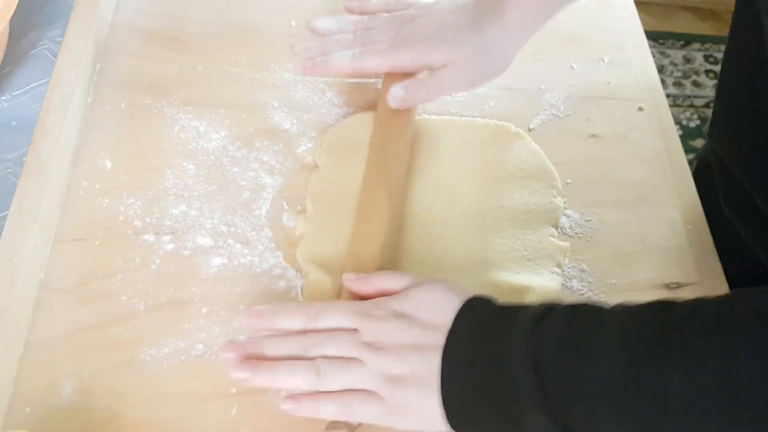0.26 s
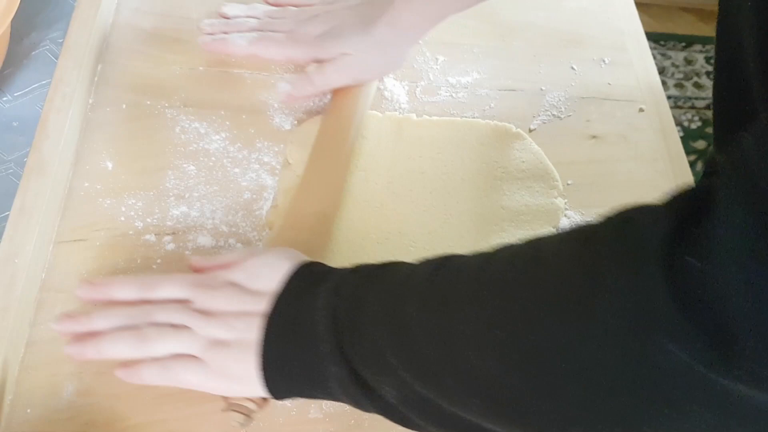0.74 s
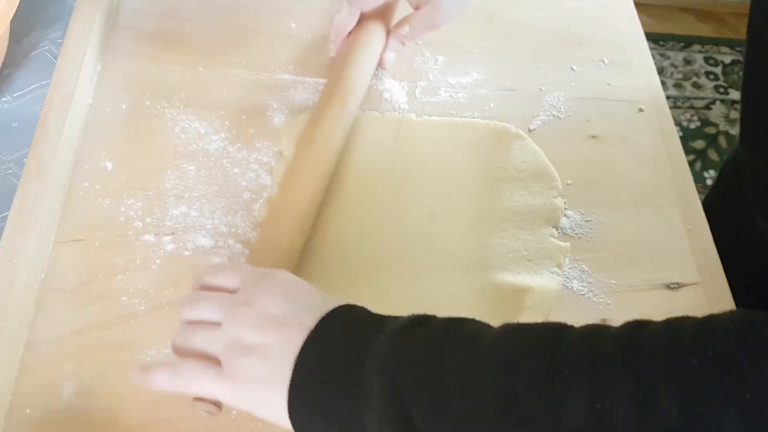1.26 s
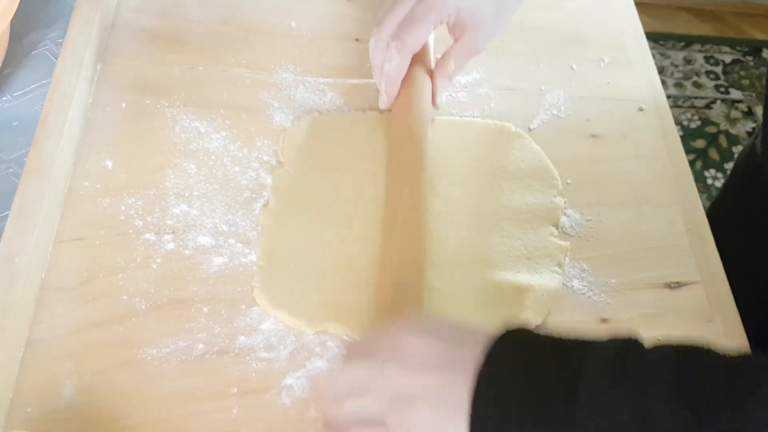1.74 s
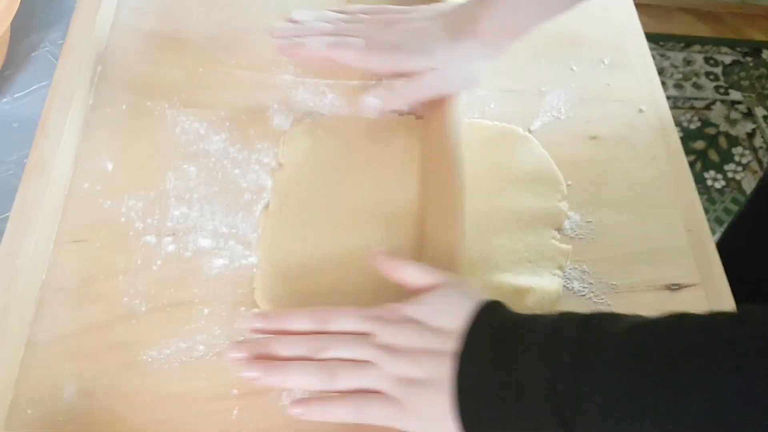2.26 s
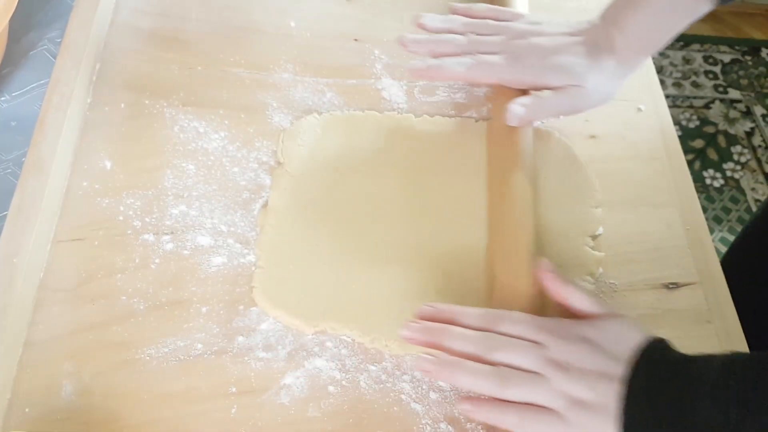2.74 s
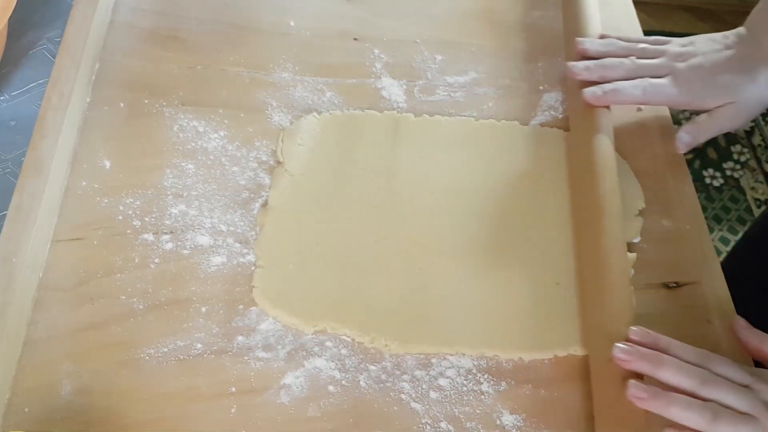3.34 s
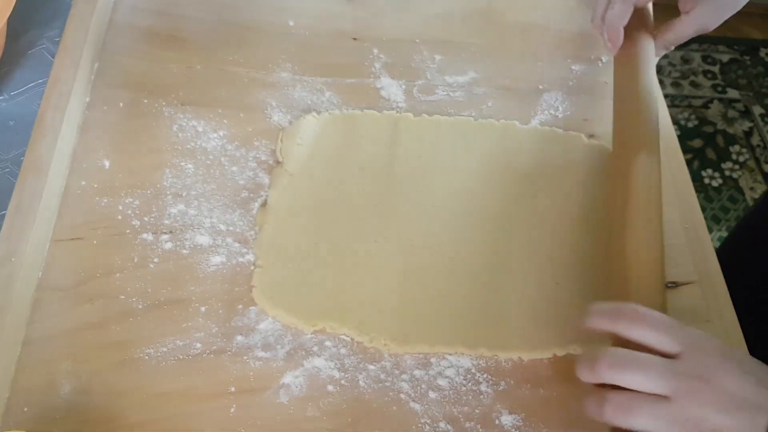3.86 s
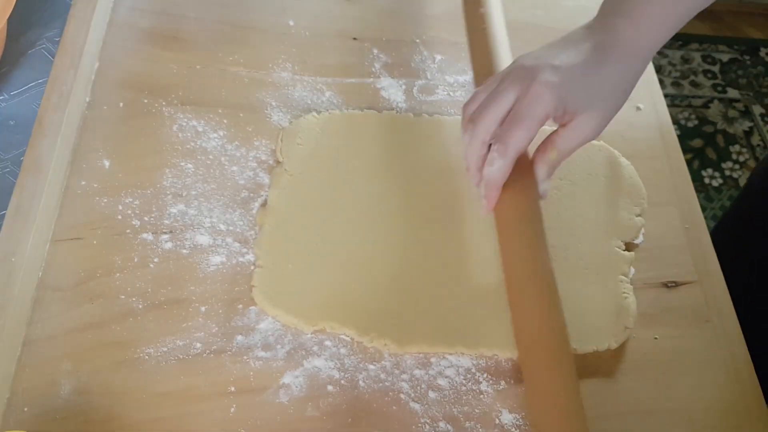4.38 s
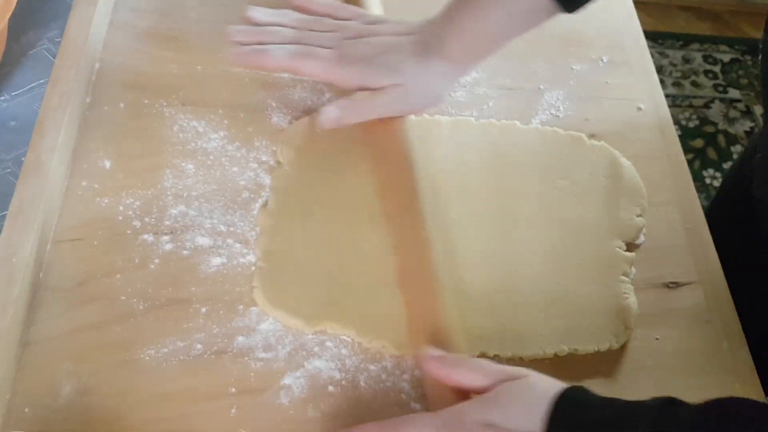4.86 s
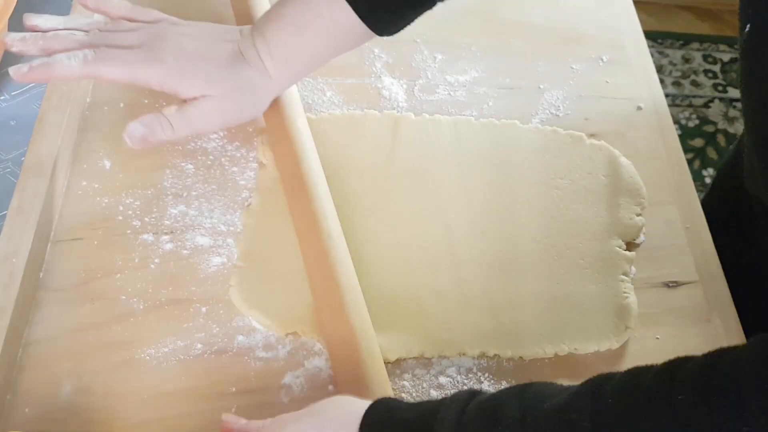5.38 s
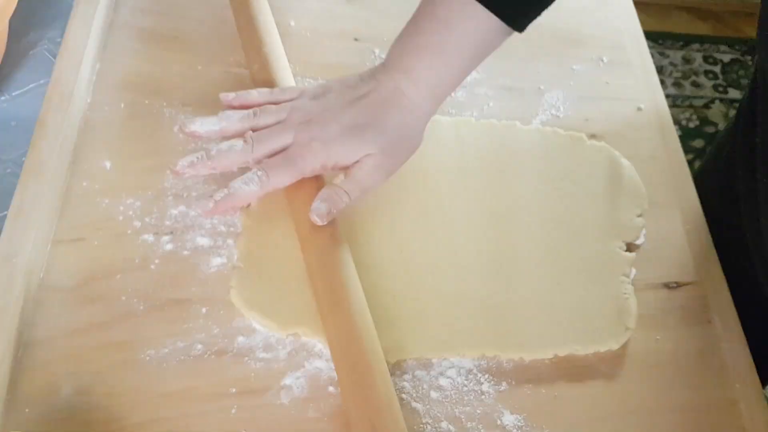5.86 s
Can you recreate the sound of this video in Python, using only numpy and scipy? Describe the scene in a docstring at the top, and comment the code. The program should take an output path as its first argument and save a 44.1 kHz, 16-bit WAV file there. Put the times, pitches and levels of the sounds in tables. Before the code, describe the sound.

A wooden rolling pin rolls softly over dough on a board, with scattered light knocks and a loud cluster of sharp wood knocks later on.

```python
"""A wooden rolling pin knocks on a wooden board in a small hard-walled kitchen, close to a stereo camera:
short pushes of force ring the modes of board and pin, and a random echo tail answers from the room.
The pin also rolls and skids, as trains of tiny slips through the same modes, and lands on the dough
with low decaying booms. Floury palms hiss as shaped noise and squeak faintly as narrow-band puffs,
over a quiet steady noise for the hum of the kitchen and the hiss of the microphones."""
import sys
import numpy as np
from scipy import signal
from scipy.io import wavfile
from scipy.ndimage import uniform_filter1d

SR = 44100
rng = np.random.default_rng(int(sys.argv[2]) if len(sys.argv) > 2 else 0)


def inscribe(sig):
    """Save sig as 16-bit PCM at rate SR to the path in sys.argv[1].

    A 1-D sig is mono; a 2-D sig holds one channel per row.
    Samples are clipped to [-1, 1] before scaling.
    """
    pcm = np.round(np.clip(np.atleast_2d(sig).T, -1, 1) * 32767)
    wavfile.write(sys.argv[1], SR, pcm.astype(np.int16))


N = 269451


def amp(db):
    """Level law: 20 dB is a factor of ten in amplitude."""
    return 10 ** (np.asarray(db) / 20)


def evened(x):
    """Normalisation to unit root-mean-square value."""
    return x / np.sqrt(np.mean(x ** 2) + 1e-20)


def read(points, hz):
    """Interpolation of a spectral curve along a logarithmic frequency axis."""
    f, value = np.transpose(points)
    return np.interp(np.log(hz + 1), np.log(f + 1), value)


def add(mix, s, sound):
    """Superposition: the sound joins the mix at time s, cut off at its end."""
    part = mix[..., round(s * SR):][..., :sound.shape[-1]]
    part += sound[..., :part.shape[-1]]


def resonate(x, hz, width):
    """Damped resonance: one complex pole rings as a dying sine, with gain near 1 at its centre."""
    radius = np.exp(-np.pi * width / SR)
    pole = radius * np.exp(2j * np.pi * hz / SR)
    return 2 * signal.lfilter([1 - radius], [1, -pole], x).imag


def correlate(left, other, likeness):
    """Partial coherence: the right channel mixes the left one with an independent one, keeping power."""
    return np.array([left, likeness * left + np.sqrt(1 - likeness ** 2) * other])


def noise(spectrum, likeness, patchy_db):
    """Spectral shaping of partly coherent stereo Gaussian noise whose level drifts in patches."""
    frames, hz = N // 128 + 5, np.fft.rfftfreq(512, 1 / SR)
    a, b, c, d, patches = rng.standard_normal((frames, 257, 5)).T
    patches = uniform_filter1d(patches, 6, 0)  # over frequency
    patches = evened(uniform_filter1d(patches, 16, 1))  # over time
    coherence = np.clip(read(likeness, hz), -1, 1)[:, None]
    z = correlate(a + 1j * b, c + 1j * d, coherence)
    z *= amp(read(spectrum, hz)[:, None] + patchy_db * patches)
    return evened(signal.istft(z, nperseg=512, noverlap=384)[1][:, :N])


def burst(t, rise_s, fade_db_per_s):
    """Attack and exponential decay: a square-law rise from time zero, then an even fall in dB."""
    rise = np.clip(t / rise_s, 0, 1) ** 2
    return rise * amp(-fade_db_per_s * np.maximum(t - rise_s, 0))


def hum_and_hiss():
    """Stationary background: the kitchen's hum and the microphones' hiss as one broadband noise."""
    # Relative density of the background: f/Hz, density/dB per Hz
    hum_spectrum = [(12, -17), (40, -22), (100, -12), (200, -14.5), (450, -10), (900, -10), (1900, -11),
                    (3200, -25.5), (6500, -28.5), (8800, -30.5), (12500, -27.5), (16000, -25)]
    # Its left-right likeness: f/Hz, correlation
    hum_likeness = [(60, 0.13), (240, 0.7), (950, -0.15), (3770, -0.56), (15000, 0.019)]
    return amp(-65.5) * noise(hum_spectrum, hum_likeness, 1.2)


def room(x):
    """Reverberation: sparse taps of random sign decay exponentially at a rate set by frequency."""
    # Decay time of the kitchen: f/Hz, t60/s
    decay_times = [(80, 0.66), (210, 0.34), (560, 0.48), (1470, 0.47), (3880, 0.61), (9000, 0.11)]
    # Left-right likeness of the tail: f/Hz, correlation
    tail_likeness = [(100, 0.29), (300, 1), (700, 0.45), (1500, 0.036), (5000, 0.035)]
    taps = np.zeros((2, SR))
    # one tap in each slot of 20 samples, the first after 200 samples
    at = np.arange(200, SR - 20, 20) + rng.integers(0, 20, (2, (SR - 201) // 20))
    np.put_along_axis(taps, at, rng.choice([-1., 1.], at.shape), 1)
    hz, t, z = signal.stft(taps, SR, nperseg=256)
    coherence = np.clip(read(tail_likeness, hz), 0, 1)[:, None]
    z = correlate(z[0], z[1], coherence)
    decay = amp(-60 * t / read(decay_times, hz)[:, None])
    tail = signal.istft(z * decay, SR, nperseg=256)[1]
    tail /= np.linalg.norm(tail[0])
    return signal.fftconvolve(x[None], tail, axes=1)[:, :N]


def near(x):
    """Early reflection: delayed, weaker copies off table and walls join the direct sound."""
    # Early echoes re the direct sound: left delay/ms, left level/dB, right delay/ms, right level/dB
    early_echoes = [(1.2, -44, 1.554, -4), (4.6, -11.5, 4.176, -9), (8.5, -16.5, 29, -27.5)]
    out = np.array([x, x])
    for left_ms, left_db, right_ms, right_db in early_echoes:
        add(out[0], left_ms / 1000, amp(left_db) * x)
        add(out[1], right_ms / 1000, amp(right_db) * x)
    return out


def squeaks():
    """Resonant friction: short puffs of noise in a narrow band, as skin squeaks on wood."""
    # Squeaks: t/s, level before the envelope/dB, f/Hz, fade length/s
    squeak_events = [(2.102, -69, 4100, .02), (2.301, -65.5, 4190, 0.064), (2.72, -73.5, 4460, 0.033),
                     (2.828, -74, 4340, 0.036), (2.838, -72, 2610, 0.027), (3.944, -61.5, 4130, 0.0061),
                     (4.047, -63, 4100, .012), (4.139, -65, 4100, .008), (4.271, -66, 4200, 0.019),
                     (4.757, -82, 6970, 0.23), (5.317, -82, 4140, .08)]
    out = np.zeros(N)
    t = np.arange(SR // 2) / SR
    for s, db, hz, length in squeak_events:
        tone = resonate(rng.standard_normal(len(t)), hz, 250.0)
        tone = evened(resonate(tone, hz, 250.0))
        envelope = (1 - np.exp(-t / 0.0027)) * np.exp(-(t / length) ** 2)
        add(out, s, amp(db) * tone * envelope)
    return out


def palms():
    """Granular friction: flour grains hiss under the skin, and flare at each sudden slip."""
    # Palms resting and sliding on the pin: t/s, level/dB
    palm_levels = [(0, -73), (0.45, -73), (0.62, -66), (0.94, -68.5), (1.07, -78.5), (1.45, -66.5),
                   (1.9, -76.5), (2.4, -73), (2.86, -71), (3.45, -74.5), (3.58, -66.5), (3.82, -74.5),
                   (4.3, -71), (4.55, -65.5), (5.1, -74.5), (5.3, -76.5), (5.6, -67), (5.9, -76.5),
                   (6.11, -76)]
    # Slips of the skin: t/s, flare level/dB, fade/dB per s, fizz re flare/dB
    skin_slips = [(0.23, -80, 130, -12), (0.315, -70.5, 73, -3), (0.6, -68, 69, -6),
                  (1.181, -58.5, 130, -6.5), (1.66, -62, 141, -7), (1.77, -62.5, 185, -4),
                  (2.07, -69, 26, -5), (2.3, -64.5, 85, -8), (3.685, -68.5, 84, -4),
                  (4.049, -67.5, 75, -11), (4.21, -71.5, 120, -6), (4.435, -57, 135, -22),
                  (4.76, -61.5, 38, -9), (5.325, -63.5, 150, -9)]
    # Relative density of the rubbing: f/Hz, density/dB per Hz
    rub_spectrum = [(1200, -37.5), (2200, 7.5), (3200, 4), (4300, 2), (5500, -2), (7200, -2.5), (8500, -13),
                    (10500, -26), (13000, -46.5)]
    t = np.arange(N) / SR
    level = amp(np.interp(t, *np.transpose(palm_levels)))
    fizz_level = amp(-7.5) * level
    for s, db, fade, fizz_db in skin_slips:
        flare = amp(db) * burst(t - s, 0.009, fade)
        # powers add
        level = np.hypot(level, flare)
        fizz_level = np.hypot(fizz_level, amp(fizz_db) * flare)
    rub = noise(rub_spectrum, [(1000, .3), (9000, .1)], 1.5)
    fizz_spectrum = [(8000, -40.5), (10000, -7.5), (13000, -1.5), (16000, -1.5)]
    fizz = noise(fizz_spectrum, [(8000, 0.11), (16000, 0.14)], 1.5)
    return level * rub + fizz_level * fizz


def wood(force, hz, octaves, pin_db, sharpness):
    """Modal superposition: a force rings board and pin, most of all near hz; bass hardly radiates."""
    # Modes of the board: f/Hz, width at sharpness 1/Hz, relative weight/dB
    board_modes = [(240, 270, -24), (365, 61, -0.5), (383, 11, -17.5), (462, 79, 15), (548, 69, 12),
                   (591.6, 22.5, 8.5), (879, 167, 4), (1084, 214, -0.5), (1275, 134, 1.5), (1360, 235, -5),
                   (1626, 280, 0), (2140, 110, -10.5), (2380, 890, 4.5), (3100, 210, -28), (3720, 380, -20)]
    # Modes of the pin, weighted further by pin_db: f/Hz, width at sharpness 1/Hz, relative weight/dB
    pin_modes = [(672, 35, -3), (928, 30, -.5), (1230, 50, -3), (1905, 60, -4), (2695, 60, -10),
                 (3500, 120, -19), (4300, 200, -20)]
    modes = list(board_modes) + [(f, width, db + pin_db) for f, width, db in pin_modes]
    modes.sort(key=lambda mode: mode[0])
    octaves = np.maximum(octaves, .25)
    ring = 0
    for k, (f, width, db) in enumerate(modes):
        reach_db = -5 * (np.log2(f / hz) / octaves) ** 2
        # some of the lower modes swing against their neighbours at the struck spot
        sign = -1 if k % 3 == 2 and k < 13 else 1
        gain = sign * amp(db + reach_db) * f / np.sqrt(width)
        ring = ring + gain * resonate(force, f, width / sharpness)
    return signal.sosfilt(signal.butter(4, 230, "high", fs=SR, output="sos"), ring)


def friction(count, hz, pin_db, sing_db):
    """Stick-slip excitation: dense tiny slips of uneven size drive the modes of the wood."""
    # First strong bending mode of the pin, blurred by the grip: f/Hz, width/Hz
    bending_mode = (960, 170)
    size, sign, chance = rng.random((count, 3)).T
    slips = amp(-2.2 * np.log(1 - size)) * (sign - .5)
    slips = slips * (chance < 3000 / SR)  # about 3000 slips per second
    # flour softens each slip
    slips = signal.sosfilt(signal.butter(2, 1500, fs=SR, output="sos"), slips)
    body = wood(slips, hz, 2.25, pin_db, 0.84)  # modes broader than under a knock
    body /= np.sqrt(uniform_filter1d(body ** 2, 6000) + 1e-20)
    singing = evened(resonate(resonate(slips, *bending_mode), *bending_mode))
    return body + amp(np.minimum(sing_db, 6)) * singing


def drag():
    """Rolling and sliding friction: steady rolling, with a short skid at each landing or push."""
    # Pin rolling under the palms, before the mix: t/s, level/dB, singing mode (capped at 6)/dB
    roll_levels = [(0, -59, -8), (0.42, -75.5, 0), (0.55, -61, 1.5), (0.68, -55, 8), (0.92, -54.5, -9.5),
                   (1.019, -76.5, 17), (1.3, -70, -2), (1.6, -55, -19), (2.0, -67.5, -14),
                   (2.45, -64.5, -3), (2.64, -75.5, 1), (3.4, -74, 0), (3.9, -71.5, 6), (4.05, -76, 5),
                   (4.4, -68, -8), (4.999, -59, -3), (5.22, -83, -8), (5.6, -62.5, -1.5), (5.85, -74.5, -1),
                   (6.11, -92.5, -7)]
    # Skids, before the mix: t/s, level/dB, rise/s, fade/dB per s, centre of reached modes/octaves re 500 Hz,
    # pin weight/dB, singing mode/dB
    skid_events = [(0.035, -53.5, 0.0086, 130, -0.22, -12, -16), (0.516, -44.5, 0.012, 77, 0.097, -11, 0),
                   (0.727, -54, 0.017, 65, 0.15, 5, -7), (1.19, -45.5, 0.0089, 208, 0.3, 2, -24),
                   (1.386, -40, .012, 147, 0.23, 7, -33), (1.645, -37, 0.025, 165, -0.31, 1.5, -3),
                   (2.03, -50, 0.0096, 135, -0.17, 5, -23), (2.65, -61, .012, 44, 0.13, 8.5, -14),
                   (2.81, -60, 0.03, 86, 0.0077, 2, -0.5), (5.315, -63, 0.0081, 93, 0.37, 4, -6),
                   (5.738, -63.5, 0.014, 241, .05, 6, -13)]
    s, db, sing_db = np.transpose(roll_levels)
    t = np.arange(N) / SR
    rolling = friction(N, 505, 6, np.interp(t, s, sing_db))
    out = amp(np.interp(t, s, db)) * rolling
    taper = signal.windows.tukey(SR)[SR // 2:]
    for s, db, rise_s, fade, centre, pin_db, sing_db in skid_events:
        skid = friction(SR // 2, 500 * 2 ** centre, pin_db, sing_db) * taper
        add(out, s, amp(db) * burst(t[:SR // 2], rise_s, fade) * skid)
    return out


def thuds():
    """Low-mode response: under a soft landing the table top swells, then booms at two decaying modes."""
    # Landings on the dough, before the mix: t/s, upper boom level/dB, lower boom level/dB
    landings = [(0.034, -52.5, -67), (0.225, -62, -57), (0.268, -66, -57), (0.538, -50.5, -74),
                (1.182, -61, -79), (1.406, -50, -68), (1.677, -44, -46.5), (1.776, -55, -54),
                (2.049, -59.5, -69), (3.533, -45, -63), (3.694, -59, -68), (4.44, -40, -44),
                (4.551, -44.5, -40.5), (4.616, -46.5, -60), (4.752, -50, -67), (5.738, -69, -58)]
    # Modes of the table top, upper then lower: f/Hz, t60/s
    table_modes = [(131.3, 0.35), (83.4, 0.18)]
    out, t = np.zeros(N), np.arange(SR // 2) / SR
    for s, *levels in landings:
        for db, (hz, t60) in zip(levels, table_modes):
            rumble = np.diff(rng.standard_normal(len(t) + 1))
            rumble = evened(resonate(resonate(rumble, hz, 70.), hz, 70.))
            envelope = amp(db - 60 * t / t60) * (1 - np.exp(-t / 0.011))
            add(out, s, envelope * (np.sin(2 * np.pi * hz * t) + 0.5 * rumble))
    return out


def knock(centre, octaves, contact_ms, pin_db, far_db, crack_db):
    """Impact excitation: a smooth push, then a second as the far end lands; a noisy crack leads the ring."""
    ms = np.arange(6000) / SR * 1000 - 2  # the main push peaks at zero
    far_end_ms = 5.9
    push = np.exp(-2 * (ms / contact_ms) ** 2)
    push += amp(far_db) * np.exp(-2 * ((ms - far_end_ms) / contact_ms) ** 2)
    ring = -wood(push, 500 * 2 ** centre, octaves, pin_db, 1.0)
    crack = rng.standard_normal(len(ms)) * amp(-60 * abs(ms) / 9.9) * (ms > 0)
    crack = resonate(np.diff(crack, prepend=0), 3900, 3800)
    crack = evened(resonate(crack, 3900, 3800)) / 10
    return ring / abs(ring).max() + amp(crack_db) * crack


def knocks():
    """Direct and reverberant paths: every knock is heard at once and also sent to the room."""
    # Knocks, the push peaking 2 ms after t: t/s, peak of the ring/dB, centre of reached modes/octaves re 500 Hz,
    # spread (at least 0.25)/octaves, contact half-width/ms, pin weight/dB, far end push/dB, crack gain/dB,
    # left re right/dB, send to the room/dB
    knock_events = [(0.0405, -29.5, -0.1, 0.34, 0.6, 1, -22, -34, 2, -7),
                    (0.234, -49, 9, 0.82, 0.19, -2.1, -22, -28, -4, -4),
                    (0.272, -47.5, 3, 0.53, 0.15, -8, -11, -19, 8, -20),
                    (0.5241, -34, 0.8, 1.07, 0.23, 8, -2, -35, -4.5, 1.5),
                    (1.1805, -30, 0.56, .27, 0.27, 3, -24, -24, -4, -8),
                    (1.392, -37.5, 0.8, 0.62, 0.14, 5.5, -8.5, -46, -5, 4),
                    (1.7711, -20, 0.92, 1.13, 0.28, -4, -14.5, -46, 0.5, -5.5),
                    (2.047, -46.5, 0, 1.2, 0.33, -21, -15, -29, -4, 0.5),
                    (3.532, -11, 1.18, 0.64, .26, -0.8, -17, -47, -2, -4),
                    (3.693, -27, 1, 0.72, 0.25, -7.5, -18, -34.5, -1.1, -6),
                    (4.4399, -11.5, 0.94, 0.74, 0.18, -2.5, -18.5, -31, -0.5, 0.4),
                    (4.546, -9, 1.44, 0.64, 0.23, -3.5, -8.5, -45, -0.8, -4.5),
                    (4.611, -17, 0.86, 0.63, 0.16, -1.3, -11.5, -35.5, -2.5, -1),
                    (4.7533, -25, 1.05, 0.71, 0.26, -8, -32, -38, -4, 0.3),
                    (5.3216, -43.5, 1.4, 0.17, 0.23, -7, -15, -20, -3, 2),
                    (5.7464, -46.5, -0.2, 2.1, .09, -2, -7, -16.5, -8.5, -25)]
    direct, sent = np.zeros((2, N)), np.zeros(N)
    for s, db, *blow, pan_db, room_db in knock_events:
        sound = amp(db) * knock(*blow)
        add(direct, s, near(sound) * amp([[pan_db / 2], [-pan_db / 2]]))
        add(sent, s, amp(room_db) * sound)
    return direct, sent


def scene():
    """Superposition of the close sounds, their reverberation and the background."""
    direct, sent = knocks()
    rolling, booms = drag(), thuds()
    tilt = amp([[-.6], [.6]])  # right slightly louder
    close = direct + amp(-6.0) * near(rolling) * tilt
    close = close + booms * amp([[1.2], [-1.2]])
    wet = room(sent + amp(-9.0) * rolling + amp(-12.0) * booms) * tilt
    return close + wet + near(squeaks()) + palms() + hum_and_hiss()


def record(dry):
    """Band limitation: the converter's steady offset, then the camera's linear-phase low-pass."""
    offset, edge_hz = -.0005, 15830
    lowpass = signal.firwin(511, edge_hz, window=("kaiser", 9), fs=SR)
    return signal.oaconvolve(dry + offset, lowpass[None], "same")


dry = scene()
out = record(dry)
inscribe(out)
```